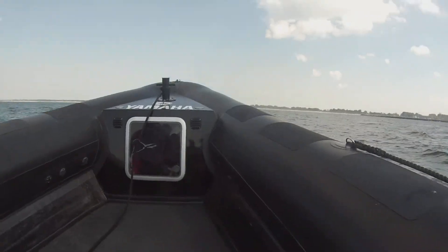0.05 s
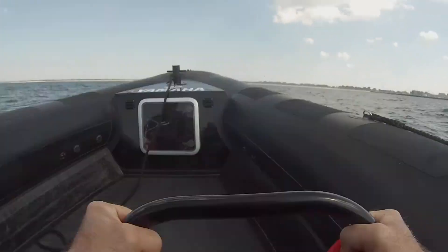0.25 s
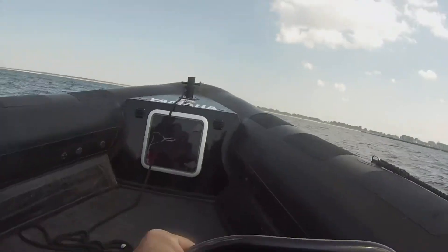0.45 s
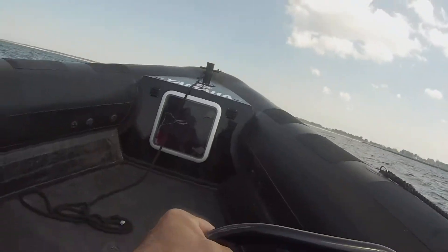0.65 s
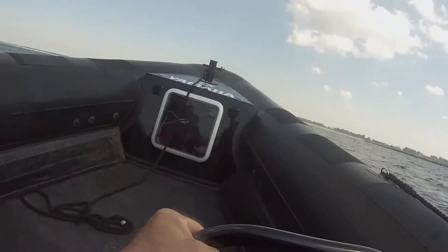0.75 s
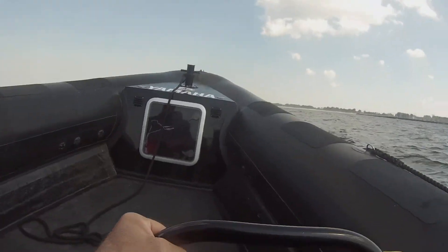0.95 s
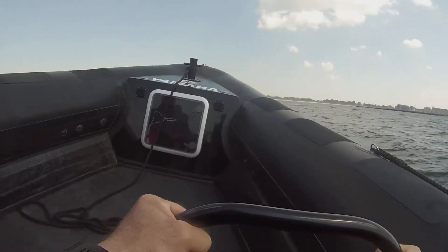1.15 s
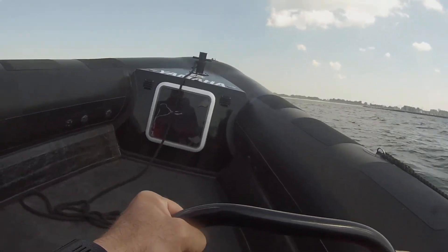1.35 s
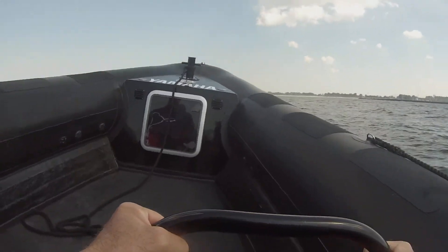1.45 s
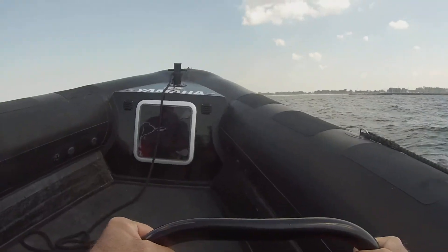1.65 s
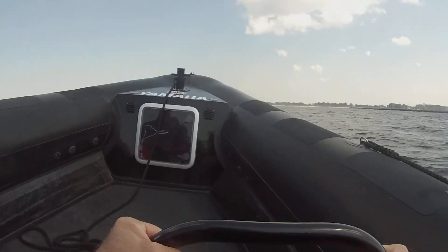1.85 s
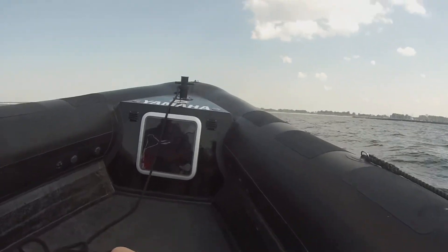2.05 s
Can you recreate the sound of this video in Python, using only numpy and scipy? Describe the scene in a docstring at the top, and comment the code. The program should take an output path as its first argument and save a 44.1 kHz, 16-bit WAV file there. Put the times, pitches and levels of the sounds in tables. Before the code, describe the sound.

A fast inflatable boat slams down: muffled wind and water rush, then at 0.22-0.43 s deep thuds, gusts, spray hiss, scraping, a tiny squeak and clustered knocks, the hardest at 0.41. Boxy, distorted plastic knocks follow near 0.78, 1.14, 1.27, 1.35, 1.57, 1.78-1.88, with weak ones at 2.03. Between them, faint water slaps, dull wind and a low outboard drone, all close and muffled inside a case.

```python
"""Muffled wind and water open, until a fast inflatable boat lands on a wave: thud, gust and hiss of spray.
The camera mount scrapes and squeaks, then knocks sharply again and again, overloading the microphone.
Contacts ring a closed waterproof case through its resonances; thuds are damped sines; wind and water are
shaped noise. The outboard's drone, harmonics of its firing rate, stays muffled behind."""
import sys
import numpy as np
from scipy import signal
from scipy.fft import rfft, irfft
from scipy.io import wavfile
from scipy.ndimage import uniform_filter1d

SR = 44100
rng = np.random.default_rng(int(sys.argv[2]) if len(sys.argv) > 2 else 0)


def store_wav(level_fs):
    """Save 16-bit WAV to argv[1]."""
    pcm = np.round(np.clip(np.atleast_2d(level_fs), -1, 1) * 32767)
    wavfile.write(sys.argv[1], SR, pcm.T.astype(np.int16))


N = 90405


def amp(db):
    """Decibels to gain."""
    return 10 ** (np.asarray(db) / 20)


def evened(x):
    """Scales to rms 1."""
    return x / np.sqrt(np.mean(x ** 2) + 1e-20)


def read(points, hz):
    """Reads a spectrum on a log-frequency axis."""
    f, value = np.transpose(points)
    return np.interp(np.log(hz + 1), np.log(f), value)


def curve(points, outside=None):
    """Reads a control curve at every sample; beyond its ends it holds, or takes the outside value."""
    return np.interp(np.arange(N) / SR, *np.transpose(points), left=outside, right=outside)


def decay(t, t60_s):
    """Exponential fall of 60 dB in t60_s."""
    return np.exp(-np.log(1000) * t / t60_s)


def add(mix, start_s, sound):
    """Mixes a sound in at its start time."""
    part = mix[max(round(start_s * SR), 0):][:len(sound)]
    part += sound[:len(part)]


def drift(hz):
    """Smooth random movement, rms 1, fading out around the given rate."""
    spectrum = rfft(rng.standard_normal(N))
    return evened(irfft(spectrum * np.exp(-(np.fft.rfftfreq(N, 1 / SR) / hz) ** 2), N))


def noise(colour):
    """Steady noise of the given spectrum, rms 1."""
    spectrum = rfft(rng.standard_normal(N))
    return evened(irfft(spectrum * amp(read(colour, np.fft.rfftfreq(N, 1 / SR))), N))


def case_ring(bright=0, push_db=0, pitch=1, size=4096):
    """The case's causal answer to one contact: resonances with dips between, minimum phase, peak 1."""
    # Resonances of the case: centre_hz, width_hz (3 dB down), relative_db
    resonances = [(130, 110, -20), (550, 805, -8.5), (747.6, 90, -12), (941, 47, -16.5), (1314.6, 165.4, 3),
                  (1552, 100, 2.5), (1977, 310, 0), (2277, 218, -3), (3020, 650, -17.5), (4080, 1300, -38),
                  (4830, 450, -30.5), (5740, 1100, -40), (7720, 180, -42), (8650, 320, -53)]
    # Broad response under the resonances: frequency_hz, relative_db
    floor = [(20, -30.5), (1500, -30.5), (2600, -36.5), (4000, -53.5), (7000, -55), (11000, -61.5),
             (16000, -77)]
    # Narrow dips between the resonances: centre_hz, width_hz (half depth), depth_db
    dips = [(842, 40, 12), (1515, 70, 10), (1850, 110, 15), (2730, 120, 9), (3570, 170, 12), (5450, 300, 9),
            (6650, 280, 10), (7900, 400, 10)]
    push_hz = 417  # the low push lies below this

    hz = np.fft.rfftfreq(size, 1 / SR)
    gain = amp(read(floor, hz))
    for centre_hz, width_hz, db in resonances:
        gain = gain + amp(db) * 2 ** (-2 * ((hz / pitch - centre_hz) / width_hz) ** 2)
    tilt_db = bright * np.log2(np.clip(hz, 1000, 8000))  # bright is in dB per octave
    gain = gain * amp(tilt_db + push_db / (1 + (hz / push_hz) ** 2))
    for centre_hz, width_hz, depth_db in dips:
        gain = gain * amp(-depth_db / (1 + (2 * (hz / pitch - centre_hz) / width_hz) ** 2))

    # Minimum phase: the ring starts at once, with nothing before the contact
    log_gain = np.log(np.r_[gain, gain[-2:0:-1]])
    ring = np.fft.ifft(np.exp(np.conj(signal.hilbert(log_gain)))).real[:size // 2]
    return ring / abs(ring).max()


def knocks():
    """Each contact chatters briefly, rings the case and leaves a faint metal tone."""
    # Knocks of the mount and their rebounds: start_s, level_db, brightness_db_per_octave, low_push_db,
    # pitch_factor, chatter_db (relative to first contact), metal_ring_db (offset to the tones below)
    contacts = [(.2365, -8, -1.5, -4, 1.1, -16, -23.5), (0.3101, -7.5, 2, -21, 1.05, -31, -20),
                (.3410, -14.5, -2, -5, 1.07, -13, -25), (0.3608, -10, -1.5, -26, 1.0, -12, -32),
                (0.3777, -7, -2, -11.5, 1.03, -0.5, -6), (0.4006, -8.5, -7, -27, 1.1, -26, -15),
                (0.4103, 8, 4, -0.5, 1.06, -12.5, -12), (0.415, 1.5, 5, -17.5, 1.05, -4.5, -7),
                (0.434, -7, 1.5, -10.5, 1.05, -9, -11), (0.7578, -31.5, 5, 2, 1.1, -1.5, -12.5),
                (.7805, -0.5, -3, -2, 1.02, -24, -26), (0.7842, -9.5, -5, 8, 1.0, -13, -28),
                (1.1445, 7.5, 6, 5.5, 1.01, -15.5, 2), (1.2725, -5.5, 0.5, 4, 1.034, -11, -25),
                (1.3479, 4.5, 1, 1, 1.046, -12.5, -4.5), (1.3547, -6.5, -4, -7, 1.04, -4.5, -17.5),
                (1.5664, 7.5, 5, 5.5, 1.032, -14.5, -1.5), (1.5732, -10, -7, -14.5, 1.08, -2, -26.5),
                (1.7800, -8, 1.5, 9, 1.02, -23.5, -18.5), (1.8296, -8, -2.5, -4, 1.04, -13.5, -23),
                (1.8767, -16, -4, 8, 1.04, -5, -36), (2.0328, -17, -0.5, 12, 1.026, 2.5, -35),
                (2.0413, -18.5, 1.5, 18, 1.06, -3.5, -39)]
    # Tones of the mount's metal: pitch_hz, relative_db, t60_s
    metal_tones = [(1653, -43, .18), (2503, -42, .08), (3690, -43, .11), (4550, -57, .38), (7262, -71, .3)]
    chatter_s = 0.0038  # time constant of the tiny contacts that follow each knock

    out, t = np.zeros(N), np.arange(SR // 2) / SR
    metal = sum(amp(db) * decay(t, t60_s) * np.sin(2 * np.pi * hz * t) for hz, db, t60_s in metal_tones)
    for start_s, db, bright, push_db, pitch, chatter_db, metal_db in contacts:
        contact = rng.standard_normal(size=1024)
        contact *= np.exp(-t[:len(contact)] / chatter_s)
        contact *= amp(chatter_db) / np.linalg.norm(contact)
        contact[0] = 1  # the knock itself
        ring = signal.fftconvolve(contact, case_ring(bright, push_db, pitch))
        add(out, start_s, -amp(db) * ring)
        add(out, start_s, amp(metal_db) * metal)
    return out


def scrape():
    """Dense uneven slips of the mount ring the case as the boat lands."""
    # Loudness of the scrape, silent outside: time_s, level_db
    level = [(.225, -71), (0.237, -14), (0.249, -26.5), (0.29, -31.5), (0.31, -17.5), (0.317, -26),
             (0.335, -41.5), (0.347, -27.5), (.357, -36), (0.367, -28), (0.37, -17.5), (.381, -19),
             (.388, -19), (0.393, -20.5), (.398, -35), (.403, -16.5), (0.407, -23.5), (.43, -67)]
    slips_per_s, spread_db, low_cut_hz = 2000, 1, 1450

    slips = (rng.random(N) < slips_per_s / SR) * amp(spread_db * rng.standard_normal(N))
    slips = slips * rng.choice([-1, 1], N)
    slips = signal.sosfilt(signal.butter(2, low_cut_hz, "highpass", fs=SR, output="sos"), slips)
    rub = signal.fftconvolve(slips, case_ring(bright=-2.2, push_db=-0.5, pitch=1.034))[:N]
    return evened(rub) * amp(curve(level, outside=-np.inf))


def squeak():
    """For a moment the mount's stick and slip locks into a rough, gliding squeak: a jittered sine."""
    # Glide of the squeak, silent outside: time_s, pitch_hz, level_db
    glide = [(0.368, 1812, -34.5), (0.37, 1723, -9), (0.378, 1480, -17), (0.38, 1408, -17),
             (0.389, 1500, -10.5), (0.393, 1499, -35.5), (.398, 1564, -38.5), (.402, 1597, -20),
             (.408, 1514, -44)]
    jitter = 0.059  # rms pitch deviation, as a fraction

    time_s, pitch_hz, level_db = np.transpose(glide)
    hz = curve(np.c_[time_s, pitch_hz]) * (1 + jitter * drift(hz=401.5))
    turns = np.cumsum(hz) / SR
    return evened(np.sin(2 * np.pi * turns)) * amp(curve(np.c_[time_s, level_db], outside=-np.inf))


def hull():
    """The landing hull gives deep, quickly damped sine thuds; water on it gives small noise slaps."""
    # Hull landing on a wave: start_s, level_db (before rise and decay), pitch_hz
    thuds = [(0.2241, -8, 46), (0.242, -3, 50.3), (0.279, -8, 52), (0.3027, -7, 49.7)]
    # Small slaps of water on the hull: start_s, level_db, length_s (twice the time to the peak)
    slaps = [(0.513, -38.5, 0.02), (0.552, -44, 0.0092), (1.449, -45.5, 0.0089), (1.639, -43.5, 0.0046),
             (1.668, -45, 0.0033), (1.894, -41.5, 0.014)]
    # Spectrum of a slap: frequency_hz, relative_db
    slap_colour = [(60, -9.5), (380, 9), (700, 0.5), (1000, -5.5), (1400, -4.5), (2300, -3), (3000, -27),
                   (8000, -56), (16000, -53)]
    rise_s, t60_s = 0.0016, 0.074  # onset time constant and decay of the thuds

    out, t = np.zeros(N), np.arange(SR // 3) / SR
    for start_s, db, hz in thuds:
        swell = (1 - np.exp(-t / rise_s)) * decay(t, t60_s)
        add(out, start_s, -amp(db) * swell * np.sin(2 * np.pi * hz * t))
    for start_s, db, length_s in slaps:
        swell = (2 * t / length_s) * np.exp(1 - 2 * t / length_s)
        add(out, start_s, amp(db) * swell * noise(slap_colour)[:len(t)])
    return out


def wind():
    """Wind buffets the case: low noise in uneven gusts."""
    # Gusts: time_s, level_db
    gusts = [(0, -38.5), (.04, -31.5), (.07, -22), (.1, -37), (.134, -25.5), (.19, -30), (.236, -11),
             (.29, -20), (.311, -4.5), (.35, -35.5), (.39, -29.5), (.46, -45.5), (.6, -48.5), (.9, -47),
             (1.08, -46), (1.22, -37.5), (1.29, -48.5), (1.33, -31), (1.41, -46.5), (1.46, -38.5),
             (1.51, -47.5), (1.72, -49.5), (1.82, -45), (1.95, -51), (2.05, -54.5)]
    # Spectrum of the buffeting: frequency_hz, relative_db
    colour = [(10, 5), (30, 6.5), (55, 3.5), (90, -0.5), (140, 1.5), (200, -9), (300, -15.5), (500, -28),
              (1000, -32), (3000, -97)]
    return noise(colour) * amp(curve(gusts))


def water():
    """Patchy rush of water and spray: noise coloured by the case, uneven over time and frequency."""
    # Rush and spray: time_s, level_db
    level = [(0, -31.5), (.04, -42.5), (.075, -38), (.12, -43), (.2, -35.5), (.24, -22.5), (.27, -24.5),
             (.33, -36), (.42, -47), (.47, -43), (.53, -49.5), (.59, -51.5), (.67, -50), (.77, -47),
             (.86, -55.5), (1.06, -51.5), (1.17, -48), (1.24, -52.5), (1.42, -57), (1.55, -53.5),
             (1.61, -48), (1.72, -61), (1.85, -54.5), (2.05, -56)]
    # Spectrum of the water inside the case: frequency_hz, relative_db
    colour = [(20, -2), (200, 2), (400, 1), (700, -2.5), (1050, -9.5), (1300, 1.5), (1600, 0.5),
              (1880, -7.5), (2300, -1), (2800, -16.5), (3700, -18), (4300, -25), (5100, -22.5), (5600, -27),
              (7000, -30.5), (9000, -39), (11000, -39), (16000, -57)]
    patch_db, flicker_db = 3, 1  # rms variation of the patches and of the whole rush

    z = signal.stft(noise(colour), nperseg=256)[2]
    patches = uniform_filter1d(rng.standard_normal(z.shape), size=5, axis=0)  # across frequency
    patches = evened(uniform_filter1d(patches, size=6, axis=1))  # across time
    rush = signal.istft(z * amp(patch_db * patches), nperseg=256)[1][:N]
    return evened(rush * amp(flicker_db * drift(hz=68.6))) * amp(curve(level))


def outboard():
    """A muffled, wavering drone: harmonics of the engine's firing rate."""
    # Firing rate: time_s, pitch_hz
    firing = [(0, 214.5), (.5, 219), (1.0, 218), (1.4, 222.5), (1.7, 224), (2.05, 219.5)]
    # Loudness of the drone: time_s, level_db
    level = [(0, -39), (.3, -36.5), (.55, -58.5), (1.0, -52), (1.25, -55), (1.7, -62.5), (2.05, -49)]
    # Harmonics: multiple of the firing rate, relative_db
    harmonics = [(1, 18.5), (2, -23.5), (3, -10)]
    waver, throb_db = .003, 1.2  # rms pitch deviation as a fraction, rms level variation

    turns = np.cumsum(curve(firing) * (1 + waver * drift(hz=12))) / SR
    drone = sum(amp(db) * np.sin(2 * np.pi * multiple * turns) for multiple, db in harmonics)
    return evened(drone) * amp(curve(level) + throb_db * drift(hz=45))


def scene():
    """Everything as it reaches the microphone inside the case."""
    return (knocks() + scrape() + squeak() + hull() + wind() + water() + outboard())[None]


def record(dry):
    """The hardest knocks overload the input; then a treble roll-off and the band limit."""
    clip_level, rolloff_hz, edge_hz = .96, 12800, 16400
    clipped = dry / (1 + (dry / clip_level) ** 8) ** (1 / 8)
    dulled = signal.sosfilt(signal.butter(4, rolloff_hz, fs=SR, output="sos"), clipped)
    band_limit = signal.firwin(511, edge_hz, window=("kaiser", 9), fs=SR)
    return signal.oaconvolve(dulled, band_limit[None], "same")


dry = scene()
out = record(dry)
store_wav(out)
```